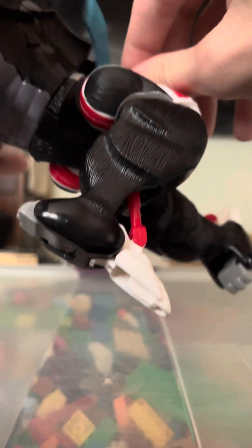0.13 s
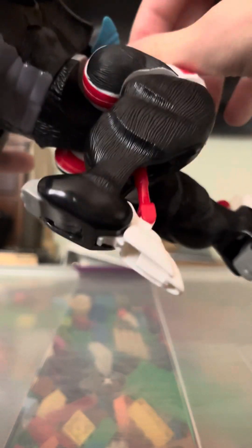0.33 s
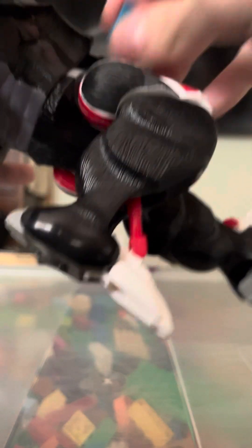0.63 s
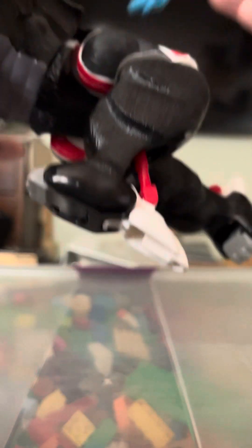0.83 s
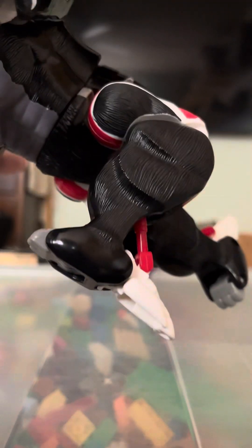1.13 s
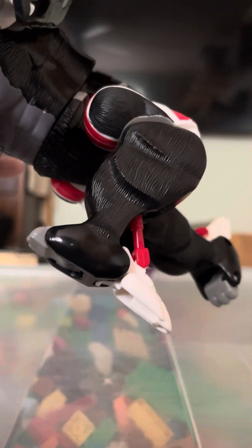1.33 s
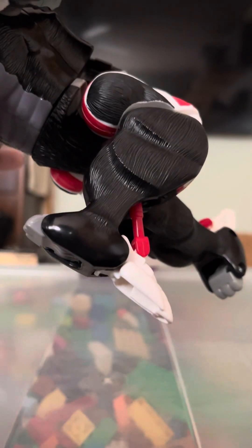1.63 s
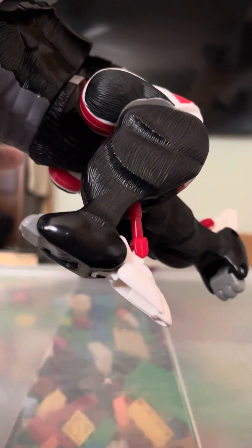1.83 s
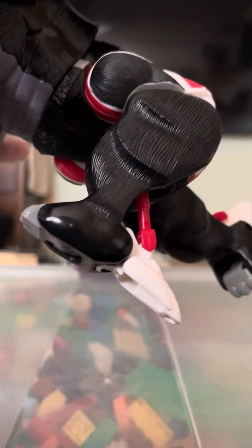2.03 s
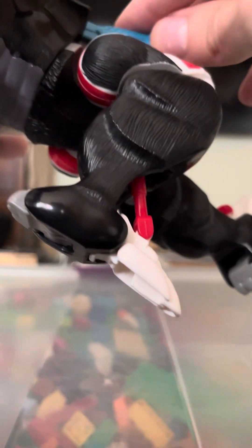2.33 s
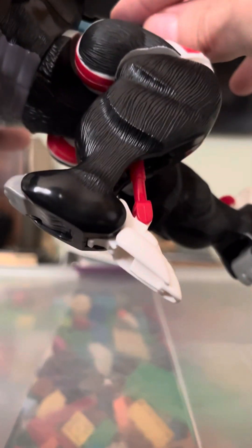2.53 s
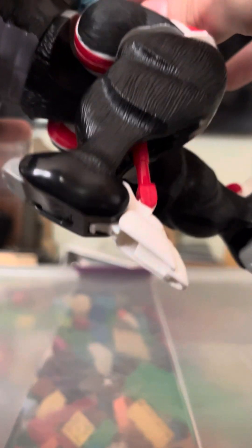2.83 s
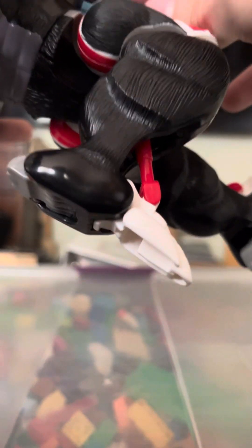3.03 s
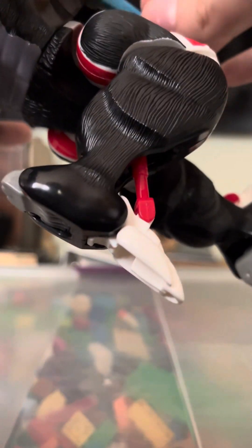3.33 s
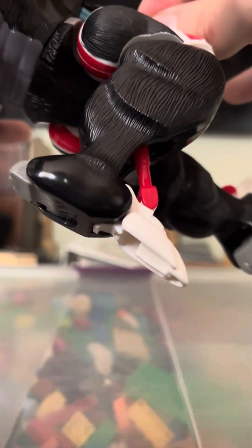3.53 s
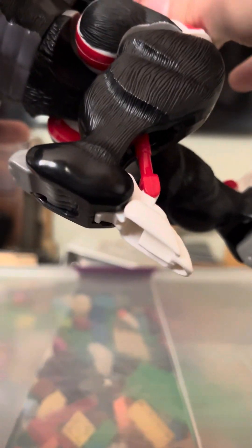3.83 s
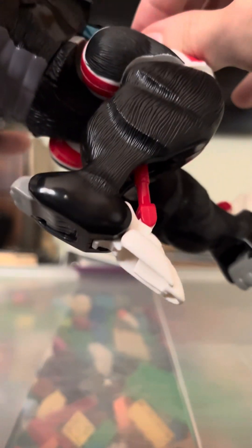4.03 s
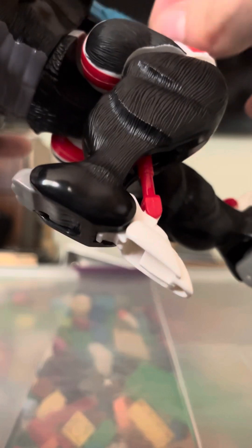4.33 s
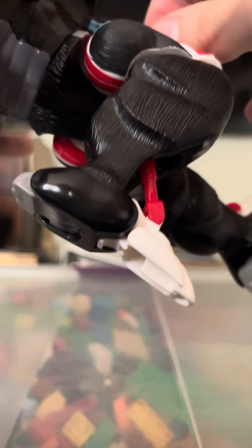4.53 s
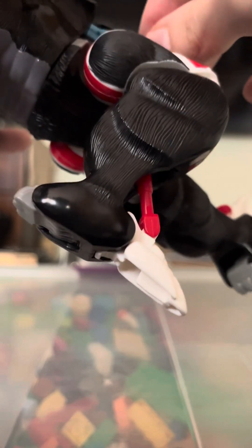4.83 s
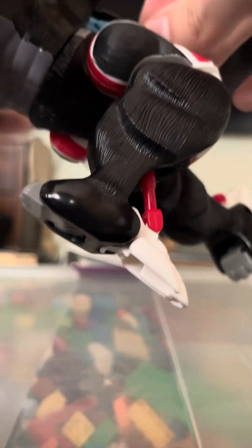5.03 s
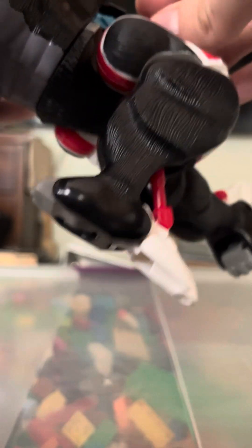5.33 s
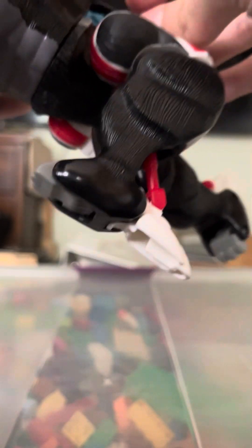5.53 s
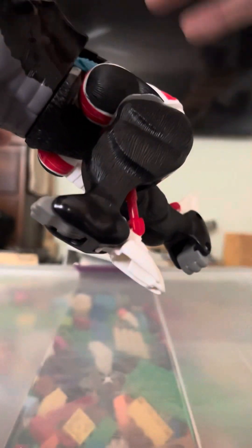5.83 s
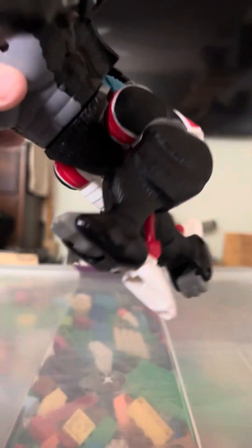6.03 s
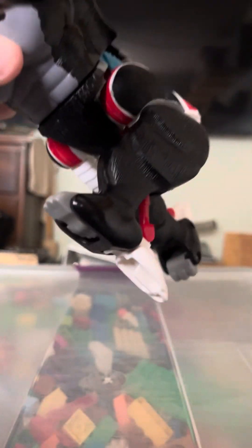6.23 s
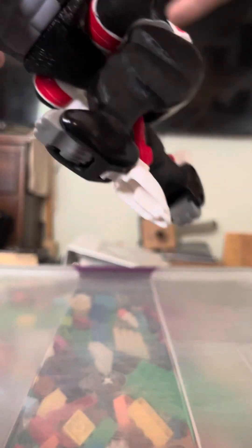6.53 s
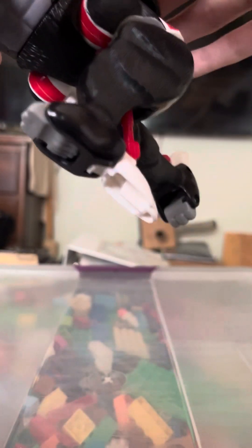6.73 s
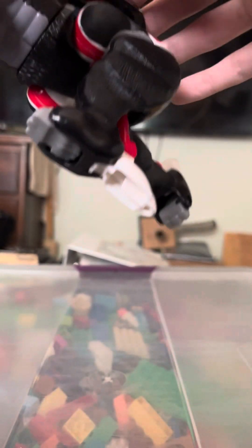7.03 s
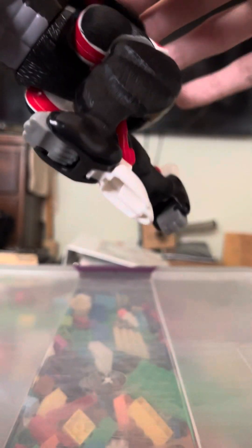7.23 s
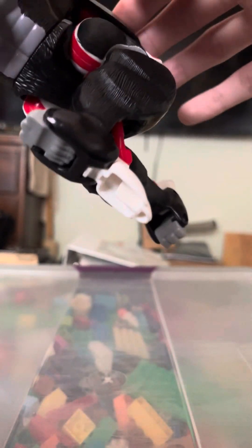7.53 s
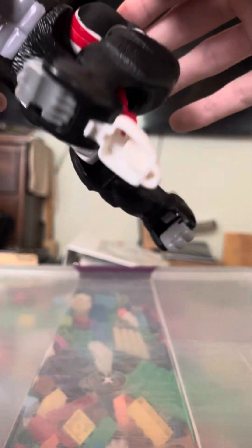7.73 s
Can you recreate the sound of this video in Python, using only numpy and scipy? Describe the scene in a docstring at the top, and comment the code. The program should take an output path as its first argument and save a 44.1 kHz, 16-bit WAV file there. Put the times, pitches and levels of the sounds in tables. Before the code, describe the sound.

Fingers turn the stiff joints of a plastic toy figure: dry, short, bright clicks with tiny ratchet rasps. After the opening flurry a part knocks on the table with low woody thumps and settles. The middle is quiet and scattered with small ticks; the last two seconds bring hard, sharp cracks. Very close pickup, short indoor reflections, low hum beneath.

```python
"""A small room: a hard plastic action figure is handled close to a pair of microphone ports.
Fingers grip the shell and turn stiff joints: noise in uneven slips makes the rub, short dense modes
the ticking teeth and the snaps. A loose part is put down on the table with a few dull thumps of
slower, low modes and a hard rattle, settles and rocks to rest. Reflections of the room follow.
Soft room air and a faint mains hum lie underneath, quieter towards the end."""
import sys
import numpy as np
from scipy import signal
from scipy.fft import rfft, irfft, next_fast_len
from scipy.io import wavfile
from scipy.ndimage import uniform_filter1d

SR = 44100
rng = np.random.default_rng(int(sys.argv[2]) if len(sys.argv) > 2 else 0)


def wav_out(sig):
    """Save sig, one row per channel (or a flat mono array), as 16-bit PCM at SR to the path in sys.argv[1]."""
    wavfile.write(sys.argv[1], SR, np.round(np.clip(np.atleast_2d(sig).T, -1, 1) * 32767).astype(np.int16))


N = 347508
TIME = np.arange(N) / SR

# joints snapping and parts knocking together:
# (time [s], level [dB], pitch of the struck part [Hz], brightness [dB per octave])
SNAPS = [(0.091, -37, 2600, -4), (0.1229, -24, 5100, 1), (0.144, -27.5, 3580, -5.5),
         (0.191, -31.5, 6060, 4), (0.2097, -27, 5500, -1), (0.2434, -29, 3350, -2),
         (0.2551, -28, 5040, -3.5), (0.2676, -30, 4845, -1), (0.3224, -42, 9030, 3.5),
         (0.3723, -46, 3608, -0.5), (0.5491, -35, 3160, -3.5), (0.5799, -31.5, 3000, -2.5),
         (0.61, -34, 5103, -4), (0.6537, -17.5, 5080, 1), (0.695, -28, 5260, 6.5), (0.7138, -24, 4760, 4.5),
         (0.756, -23.5, 5930, 5), (1.3364, -23.5, 3346, 5), (1.6666, -35, 5360, 2.5),
         (2.2086, -34, 3300, -0.5), (2.3031, -45.5, 2750, 6), (2.466, -44, 3210, -1.5),
         (2.636, -37, 2800, 4.5), (2.6585, -28, 3630, 6.5), (2.6901, -29, 3750, 7.5),
         (2.7073, -24, 7730, 5), (2.9449, -39, 3215, -3.5), (3.1043, -39, 3120, 2),
         (3.1462, -36.5, 3770, 2.5), (3.198, -38.5, 3090, -4), (3.3781, -39.5, 3080, 4.5),
         (3.4168, -39.5, 3600, 6.5), (3.4689, -30, 8970, 6), (3.492, -21.5, 4600, 2),
         (3.8091, -48.5, 3700, -3), (3.8726, -48, 2660, -4.5), (3.9012, -36, 2690, -2),
         (3.9259, -34, 3650, 2), (3.957, -43.5, 2740, -2), (4.1863, -48.5, 2670, -4.5),
         (4.2494, -46.5, 2700, 1), (4.3038, -39.5, 7640, 4.5), (4.49, -41, 3060, -5),
         (4.501, -26, 7100, 3.5), (4.613, -45.5, 2927, 0), (4.738, -37.5, 3350, 2.5),
         (4.9379, -43, 1860, -0.5), (4.993, -36, 2790, 1), (5.0284, -20.5, 6010, 2), (5.486, -27, 5080, 3),
         (5.9191, -18.5, 3500, 2), (6.0005, -27, 7320, -0.5), (6.0804, -47.5, 3870, 1.5),
         (6.2, -13.5, 5600, 3.5), (6.5, -22, 6860, 2), (6.514, -12, 6930, 5), (6.6301, -26, 5320, 7.5),
         (6.6376, -14.5, 5550, 7), (6.968, -41.5, 8350, 2.5), (6.9986, -38, 5230, 4.5),
         (7.0912, -40.5, 5000, 4.5), (7.2136, -16.5, 4780, 5), (7.247, -20, 4530, 6),
         (7.2766, -13.5, 5310, 8), (7.4743, -44.5, 4960, 8), (7.5216, -40, 4950, 3)]
# a stiff joint is turned:
# (start [s], end [s], rubbing before its trim [dB], average tooth [dB])
JOINT_TURNS = [(0.051, 0.093, -66, -53.5), (0.116, 0.236, -46.5, -35.5), (0.408, 0.626, -56.5, -67.5),
               (0.62, 0.67, -33, -28.5), (0.688, 0.779, -37.5, -36.5), (2.202, 2.26, -52.5, -51.5),
               (2.661, 2.685, -40, -37), (3.081, 3.237, -52, -52.5), (3.358, 3.451, -71.5, -49.5),
               (3.487, 3.519, -56.5, -38.5), (4.645, 4.709, -61.5, -60.5), (5.138, 5.185, -75, -63.5),
               (5.65, 5.699, -58, -55.5), (6.501, 6.542, -32.5, -28.5), (6.636, 6.69, -45.5, -40),
               (6.951, 7.041, -54, -53.5), (7.253, 7.284, -62.5, -36.5)]
# a loose part lands on the table: (time [s], level [dB], favoured pitch of the boom [Hz],
# hard contact relative to the touch [dB], settling push relative to the landing [dB],
# loss at each bounce [dB])
LANDINGS = [(1.2492, -21.5, 226, -5.5, -21.5, 22.5), (1.3101, -19.5, 261, -7.5, -15, 18),
            (1.3362, -15, 287, -3.5, -6.5, 11), (1.6209, -19, 215.6, -8.5, 0.5, 15.5),
            (5.997, -38.5, 72, -19, -11.5, 15), (7.146, -72, 360, 5, -8, 31.5)]
# colour of rubbing plastic: (frequency [Hz], level [dB])
RUB_SPECTRUM = [(200, -5), (600, -4.5), (1500, -5), (3000, 2), (5000, 1), (8000, -12), (13000, -10.5),
                (16000, -29.5)]


def from_db(db):
    """Decibels to gain."""
    return 10 ** (np.asarray(db) / 20)


def rms_one(x):
    """Scale to rms 1."""
    return x / np.sqrt(np.mean(x ** 2) + 1e-20)


def decay_60db(t, t60):
    """Exponential decay that loses 60 dB in t60 seconds."""
    return np.exp(-np.log(1000) * t / t60)


def at_hz(points, hz, axis=1):
    """Read a table column on a log-frequency axis."""
    points = np.array(points)
    return np.interp(np.log(np.maximum(hz, 1)), np.log(points[:, 0]), points[:, axis])


def coloured(x, spectrum):
    """Give a signal a spectrum; rms 1."""
    size = next_fast_len(x.shape[-1])
    gain = from_db(at_hz(spectrum, np.fft.rfftfreq(size, 1 / SR)))
    shaped = irfft(rfft(x, size) * gain, size)
    return rms_one(shaped[..., :x.shape[-1]])


def add(track, s, sound):
    """Mix a sound into a track at a time in seconds."""
    start = max(0, round(s * SR))
    track[..., start:start + sound.shape[-1]] += sound[..., :max(0, N - start)]


def background(air_db=-71.0, waver=0.14, sink_s=6.55, sink_fade_s=.25, sink_db=5):
    """Soft room air as coloured noise and a slightly wavering mains hum; late on, both grow quieter."""
    # colour of the room air: (frequency [Hz], level [dB])
    air_spectrum = [(25, -16), (55, 0.5), (100, -4.5), (170, -10.5), (270, -7), (450, -22), (900, -26),
                    (1700, -23.5), (2600, -32), (4500, -31.5), (16000, -46)]
    # mains hum before it wavers and sinks: (frequency [Hz], rms level [dB])
    hum_tones = [(59, -68), (118, -83)]
    air = from_db(air_db) * coloured(rng.standard_normal((2, N)), air_spectrum)
    hum = np.zeros(N)
    for hz, db in hum_tones:
        hum += np.sqrt(2) * from_db(db) * np.sin(2 * np.pi * (hz * TIME + rng.random()))
    wobble = np.interp(TIME, np.linspace(0, TIME[-1], 60), rng.standard_normal(60))
    sunk = np.clip((TIME - sink_s) / sink_fade_s, 0, 1)
    return (air + hum * (1 + waver * wobble)) * from_db(-sink_db * sunk)


def rubbing(trim_db=-4.5, slips_per_s=700, uneven_db=4.5, slip_s=0.00064, smooth=0.89,
            grip_s=.05, grip_db=-43.5):
    """Stick and slip: a dense, uneven run of tiny rasps under each stroke."""
    sizes = from_db(uneven_db * np.minimum(rng.exponential(1, N), 4))
    slips = (rng.random(N) < slips_per_s / SR) * sizes
    # each slip dies away exponentially
    slipping = rms_one(signal.lfilter([1], [1, -np.exp(-1 / (slip_s * SR))], slips + 1e-18))
    rasp = coloured((slipping + smooth) * rng.standard_normal(N), RUB_SPECTRUM)
    # the fingers tighten and rub before each snap, at a level that follows it
    strokes = [turn[:3] for turn in JOINT_TURNS]
    strokes += [(s - grip_s, s, db + grip_db) for s, db, _, _ in SNAPS]
    pressure = np.zeros(N)
    for start, end, db in strokes:
        stroke = signal.windows.tukey(max(2, int((end - start) * SR)), .5)
        add(pressure, start, from_db(db + trim_db) * stroke)
    return pressure * rasp


def teeth(count=6, jitter=0.88, pitch_hz=3500, spread_octaves=0.55, spread_db=2,
          bright_db=-0.5, bright_per_db=0.21):
    """A turn drags the joint over a few teeth unevenly, so quick turns rattle faster; rows as in SNAPS."""
    rows = []
    usual_db = np.mean([turn[3] for turn in JOINT_TURNS])
    for start, end, _, db in JOINT_TURNS:
        uneven = np.clip(jitter, 0, 1) * (rng.random(count) - .5)
        place = (np.arange(count) + .5 + uneven) / count
        # the teeth differ in strength and pitch; harder ones are brighter
        force, size = rng.standard_normal((2, count))
        tooth_db = db + spread_db * np.tanh(force)
        tooth_hz = pitch_hz * 2 ** (spread_octaves * size)
        brightness = bright_db + bright_per_db * (tooth_db - usual_db)
        rows += zip(start + (end - start) * place, tooth_db, tooth_hz, brightness)
    return rows


def rebounds(delay_s=.0045, weaker_db=-12.5, spread_db=6.5):
    """A snapped part strikes once more, weaker, a moment later; rows as in SNAPS."""
    rows = []
    chance = rng.uniform(-1, 1, (len(SNAPS), 2))
    for (s, db, hz, bright_db), (late, force) in zip(SNAPS, chance):
        again_s = s + delay_s * (1 + .5 * late)
        rows.append((again_s, db + weaker_db + spread_db * force, hz, bright_db))
    return rows


def clicks(part_db=9.5, part_octaves=0.079, part_ring=1.4, knock_hz=1300, softness=0.044,
           pivot_hz=3800, attack_s=0.0004, uneven_db=3.5, port_db=4.5, ring_spread=.7,
           strain_db=-21.5, strain_s=0.0029):
    """Each contact rings dense, short modes of the shell, heard at the left port, right port and room."""
    # colour of the hollow plastic shell: (frequency [Hz], level [dB])
    shell_spectrum = [(200, -35), (500, -15.5), (1000, -16.5), (1500, -7.5), (2300, -6), (3200, -2.5),
                      (5000, -0.5), (7500, -5.5), (10000, -12), (12500, -8), (15000, -21.5), (16500, -34.5)]
    # typical ring of the shell before the spread between modes: (frequency [Hz], t60 [s])
    shell_ring = [(300, 0.018), (2000, 0.024), (5000, 0.012), (14000, 0.008)]
    out, t = np.zeros((3, N)), TIME[:SR // 30]
    grid = np.linspace(250, 16500, 120)  # mode frequencies [Hz] before scatter
    loudest_db = max(row[1] for row in SNAPS)
    for s, db, part_hz, bright_db in SNAPS + rebounds() + teeth() + contacts():
        spread, phase = rng.random((2, len(grid)))
        hz = grid + (spread - .5) * (grid[1] - grid[0])
        # modes of the struck part stand out and last longer
        part = np.exp(-.5 * (np.log2(hz / part_hz) / part_octaves) ** 2)
        # a gentle contact is duller than a hard one
        knock_db = softness * (loudest_db - db) / (1 + (hz / knock_hz) ** 4)
        tilt = np.log2(np.maximum(hz, pivot_hz / 2) / pivot_hz)
        shell_db = at_hz(shell_spectrum, hz) + knock_db + bright_db * tilt
        # groups of modes beam in their own directions; the room gathers all and evens them out
        beam, skew = rms_one(uniform_filter1d(rng.standard_normal((2, len(grid))), size=3))
        near_db = part_db * part + uneven_db * beam
        ways_db = np.array([near_db + port_db * skew, near_db - port_db * skew, .5 * part_db * part])
        gain = from_db(shell_db + ways_db)
        # some modes are less damped by the hand than others
        damping = np.exp(ring_spread * (rng.random(len(grid)) - .5))
        t60 = at_hz(shell_ring, hz) * (1 + (part_ring - 1) * part) * damping
        waves = np.sin((2 * np.pi * (np.outer(hz, t) + phase[:, None])).astype(np.float32))
        decay = np.exp((-np.log(1000) * np.outer(1 / t60, t)).astype(np.float32))
        snap = gain @ (waves * decay) * (1 - np.exp(-(t / attack_s) ** 2))
        # the level is that of the first 5 ms
        strength = np.sqrt(np.mean(snap[:, :SR // 200] ** 2, axis=1, keepdims=True))
        add(out, s, from_db(db) * snap / strength)
        # a rasp swells for an instant before the contact
        swell = np.exp((t - t[-1]) / strain_s)
        strain = coloured(rng.standard_normal(len(t)), RUB_SPECTRUM) * swell
        add(out, s - t[-1], from_db(db + strain_db) * strain)
    return out


def touches(count=5, bounce_s=.057):
    """A landed part rocks, weaker each time: (time [s], level [dB], pitch [Hz], hard contact [dB])."""
    rows = []
    for s, db, hz, hard_db, _, loss_db in LANDINGS:
        for k in range(count):
            rows.append((s + k * bounce_s, db - k * loss_db, hz, hard_db))
    return rows


def contacts(shell_db=-10, shell_hz=2008, bright_db=3.5):
    """The click of the shell at each touch on the table; rows as in SNAPS."""
    return [(s, db + hard_db + shell_db, shell_hz, bright_db) for s, db, _, hard_db in touches()]


def settling(delay_s=.025, push_hz=94, soft_db=-17.5):
    """The part's weight follows the first touch as a deep, soft push; rows as in touches."""
    rows = []
    for s, db, _, _, weight_db, _ in LANDINGS:
        rows.append((s + delay_s, db + weight_db, push_hz, soft_db))
    return rows


def thumps(build_cycles=1.4, focus_db=9.0, rattle_db=-0.5, rattle_t60=0.05,
           crack_db=9.5, crack_t60=0.032, rise_s=0.0015):
    """Bending waves: low table modes build up late, so a thump falls in pitch; high ones blur to a rattle."""
    # modes of the table before detuning: (frequency [Hz], level [dB], t60 [s])
    table_modes = [(67.6, -2, 0.34), (97.7, 0.5, 0.18), (128.5, -5, 0.23), (161.1, -8, 0.28),
                   (191.4, -7.5, 0.19), (231.6, 2, 0.13), (293.6, 0, 0.18), (344, -13, 0.12)]
    # colour of the hard rattle on the table: (frequency [Hz], level [dB])
    rattle_spectrum = [(250, -23), (430, -0.5), (570, 0), (750, -6), (1170, 5), (1800, -9.5), (3000, -29),
                       (7000, -56)]
    boom, rattle, t = np.zeros(N), np.zeros(N), TIME[:SR // 2]
    hz, mode_db, t60 = np.array(table_modes).T[:, :, None]
    fade = decay_60db(t, rattle_t60) + from_db(crack_db) * decay_60db(t, crack_t60)
    fade = fade * (1 - np.exp(-(t / rise_s) ** 2))
    for s, db, pitch_hz, hard_db in touches() + settling():
        phase, detune = rng.random((2, len(hz), 1))
        build = 1 - np.exp(-(t * hz / build_cycles) ** 2)
        waves = np.sin(2 * np.pi * (hz * (1 + 0.079 * (detune - .5)) * t + phase))
        # the place of the blow decides which modes it drives
        gain = from_db(db + mode_db - focus_db * np.abs(np.log2(hz / pitch_hz)))
        add(boom, s, np.sum(gain * build * waves * decay_60db(t, t60), axis=0))
        noise = coloured(rng.standard_normal(len(t)), rattle_spectrum)
        add(rattle, s, from_db(db + hard_db + rattle_db) * fade * noise)
    return boom, rattle


def room(x, early_db=8.5, early_t60=0.12, gap_s=0.0028):
    """Quick reflections from nearby surfaces, then a tail with its own decay in each band; one per channel."""
    # the room's reverberation: (frequency [Hz], level [dB], t60 of the tail [s])
    reverberation = [(150, -18.5, 0.24), (476, -4.5, 0.53), (1470, -8.5, 0.15), (5000, -12.5, 0.3),
                     (12200, -20, 0.22), (16100, -18.5, 0.65)]
    t, response = TIME[:SR // 2], 0
    edges = np.geomspace(90, 18000, 12)
    for low, high in zip(edges, edges[1:]):
        hz = np.sqrt(low * high)
        band_pass = signal.butter(2, [low, high], "band", fs=SR, output="sos")
        band = signal.sosfilt(band_pass, rng.standard_normal((2, len(t))))
        tail = decay_60db(t, at_hz(reverberation, hz, axis=2))
        fade = tail + from_db(early_db) * decay_60db(t, early_t60)
        fade = fade * (1 - np.exp(-(t / gap_s) ** 2))
        level = from_db(at_hz(reverberation, hz)) / np.sqrt(np.sum(fade ** 2))
        response = response + level * band * fade
    return signal.fftconvolve(x[None], response, axes=1)[:, :N]


def scene(rattle_lag_s=0.00034, table_room_db=-5.0):
    """Figure and table in the room; the rattle reaches the right port first, the left one late."""
    left, right, all_round = clicks() + rubbing()
    boom, rattle = thumps()
    table = boom + np.array([np.interp(TIME - rattle_lag_s, TIME, rattle), rattle])
    tail = room(all_round + from_db(table_room_db) * (boom + rattle))
    return np.array([left, right]) + table + tail + background()


def record(dry, width=0.94, wide_from_hz=180, wide_to_hz=5000, right_db=1.0, low_cut_hz=42,
           peak_limit=.92, top_cut_hz=16600):
    """Two close microphone ports: wide in the midrange, right one late in the treble, peaks rounded."""
    # phase lag added to the right port; negative is a lead: (frequency [Hz], lag [radians])
    port_lag = [(0, 0), (400, -.4), (1500, -.6), (2300, .5), (2750, 2.2), (3200, 1.4), (4100, 2.2),
                (4700, 1.5), (5900, 3.14), (17000, 19)]
    size = next_fast_len(N + SR // 10)
    hz = np.fft.rfftfreq(size, 1 / SR)
    left, right = rfft(dry, size)
    # the ports merge in the bass and the treble
    wide = hz ** 2 / (hz ** 2 + wide_from_hz ** 2) / (1 + (hz / wide_to_hz) ** 12)
    apart = np.clip(width, 0, 1) * wide
    right = (left + apart * (right - left)) * from_db(right_db * wide)
    right = right * np.exp(-1j * np.interp(hz, *np.transpose(port_lag)))
    both = irfft(np.array([left, right]), size)[:, :N]
    low_cut = signal.butter(4, low_cut_hz, "high", fs=SR, output="sos")
    both = signal.sosfilt(low_cut, both)
    # peaks are rounded before the top is cut
    both = both / (1 + (both / peak_limit) ** 4) ** .25
    top_cut = signal.ellip(10, .3, 80, top_cut_hz, fs=SR, output="sos")
    return signal.sosfilt(top_cut, both)


dry = scene()
out = record(dry)
wav_out(out)
```